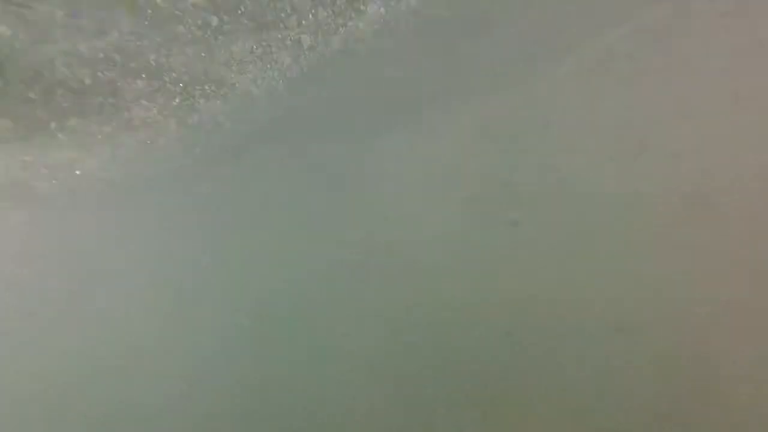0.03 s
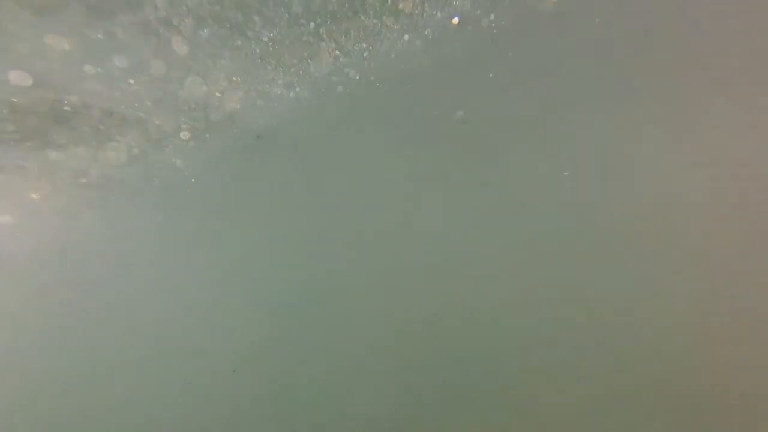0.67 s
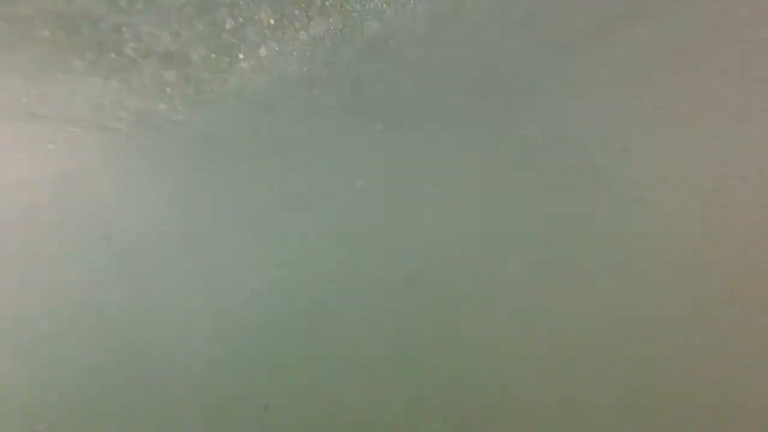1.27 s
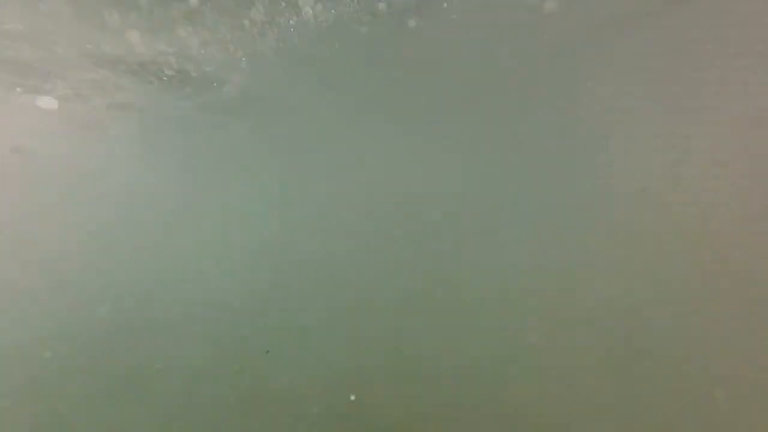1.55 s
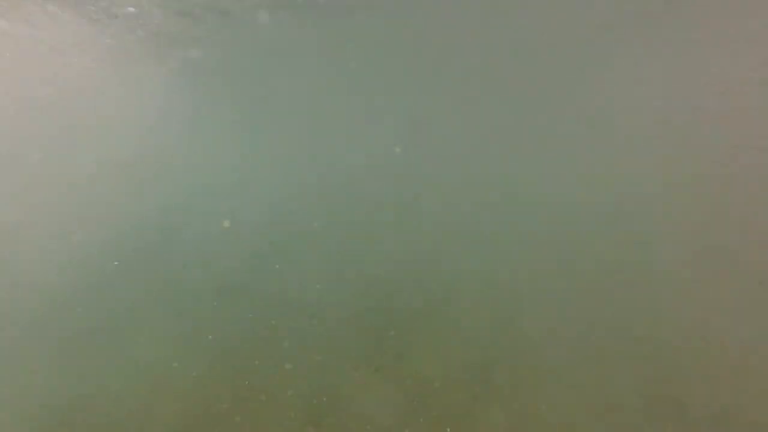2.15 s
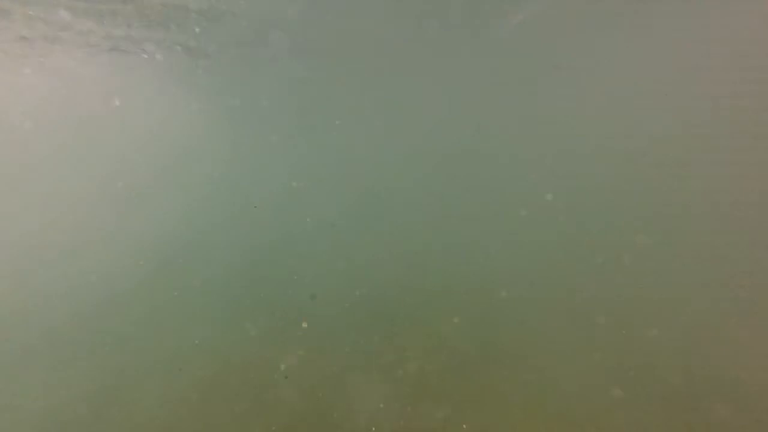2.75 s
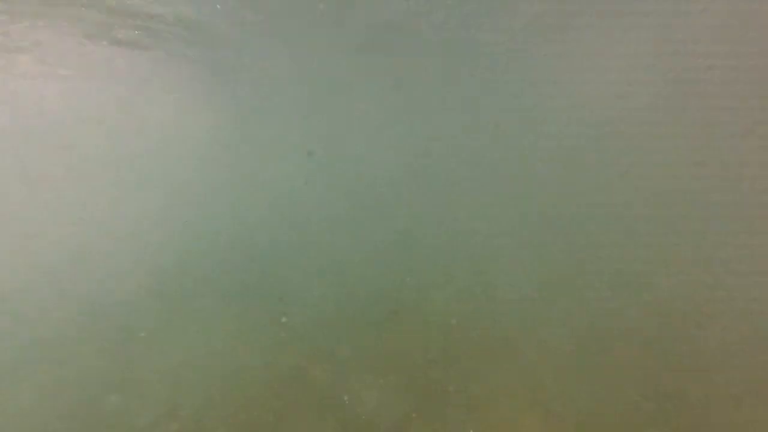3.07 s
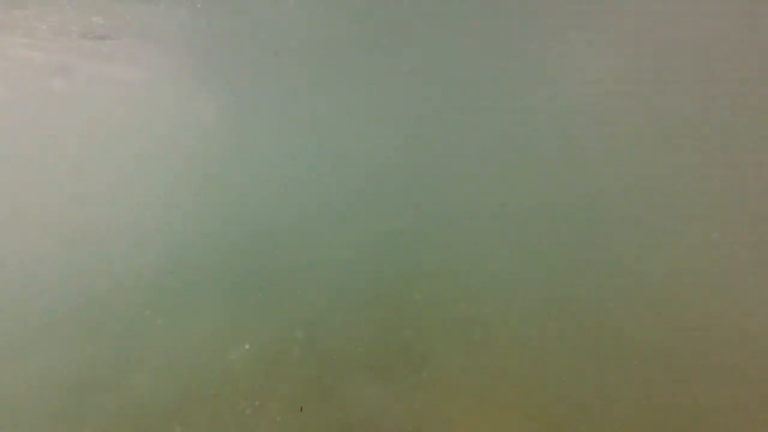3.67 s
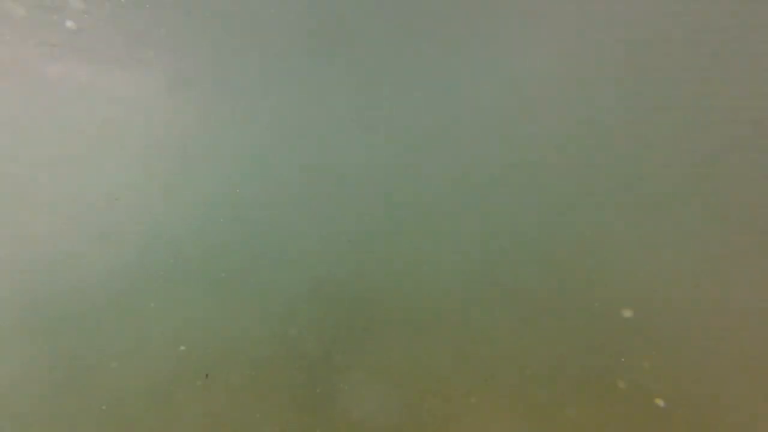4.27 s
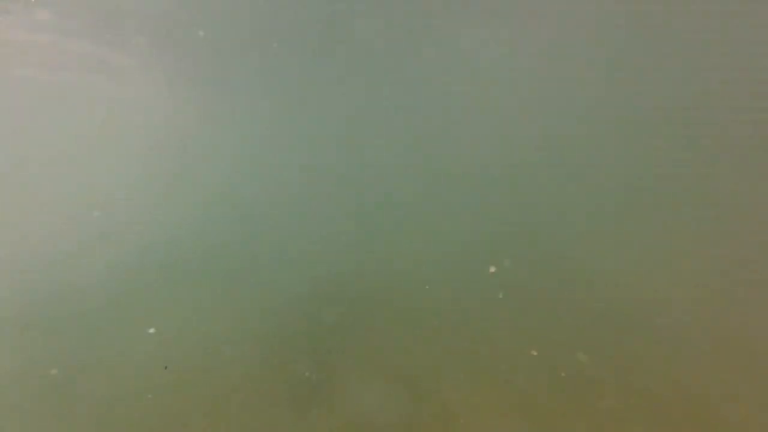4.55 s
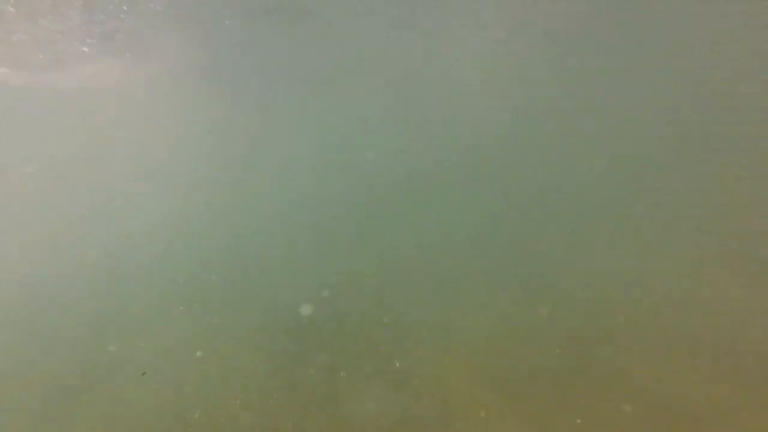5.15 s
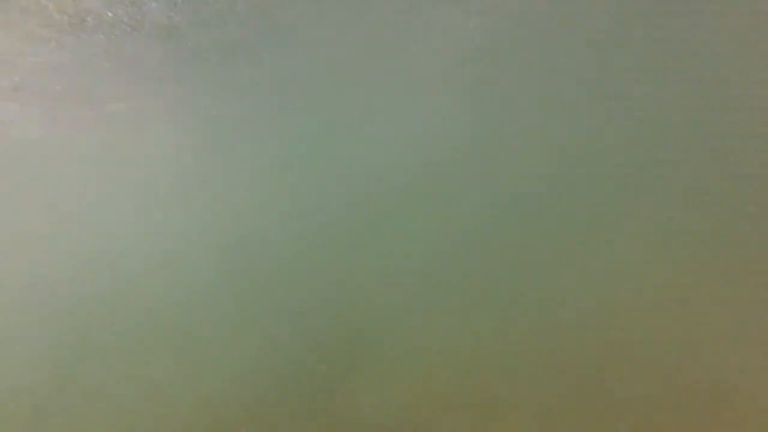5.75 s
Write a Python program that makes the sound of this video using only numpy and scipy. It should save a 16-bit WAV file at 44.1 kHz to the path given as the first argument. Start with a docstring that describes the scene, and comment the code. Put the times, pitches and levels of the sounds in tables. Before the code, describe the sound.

Small waves break overhead, heard from underwater through a submerged camera's own microphone for about six seconds. A muffled rush of surf and a hollow, uneven hum run throughout, above a low rumble that swells and eases with the surge. Air bubbles pop and plip close by, many each second at irregular intervals, with a finer crackle and light fizz farther out. The sharpest pops come at about 1.2, 1.4 and 5.3 seconds. Eddies bump the housing with soft, dull thuds, frequent during the first two seconds, returning just after 3 seconds and clustering again from 5.3 to 5.7 seconds. The distant crackle eases around 3.5 seconds, when the close pops also thin out, then builds slightly toward the end. A very faint, thin electronic whine from the camera appears for a moment at about 2.5 seconds and again at 5.1 seconds.

```python
"""Small waves breaking over a submerged camera, heard through its own microphone. The surge presses on
the housing and eddies bump against it. Pinched-off air bubbles ring for a few cycles each, singly
close by and as a fine crackle farther out, over the steady rush of the surf and a hollow drone of
the housing. Twice the camera's electronics whine faintly."""
import sys
import numpy as np
from scipy import signal
from scipy.fft import rfft, irfft, next_fast_len
from scipy.io import wavfile
from scipy.ndimage import uniform_filter1d, map_coordinates

SR = 44100
rng = np.random.default_rng(int(sys.argv[2]) if len(sys.argv) > 2 else 0)


def file_out(sig):
    """Save sig as 16-bit WAV at sys.argv[1]."""
    # one column per channel
    cols = np.atleast_2d(sig).T
    # limit, then scale
    lim = np.clip(cols, -1, 1)
    pcm = np.round(lim * 32767).astype(np.int16)
    wavfile.write(sys.argv[1], SR, pcm)


N = 260631


def amp(db):
    """Decibels to gain."""
    return 10 ** (np.asarray(db) / 20)


def unit(x):
    """Scale to rms 1."""
    return x / np.sqrt(np.mean(x ** 2) + 1e-20)


def curves(rows):
    """One value per sample for each column after the time."""
    times, *columns = np.transpose(rows)
    return [np.interp(np.arange(N) / SR, times, column) for column in columns]


def wobble(knots_per_s):
    """A smooth random curve."""
    return map_coordinates(rng.standard_normal(4096), [np.arange(N) * knots_per_s / SR], mode="wrap")


def filtered(x, response):
    """Pass x through a response given as a function of Hz."""
    size = next_fast_len(N + SR // 2)
    return irfft(rfft(x, size) * response(np.fft.rfftfreq(size, 1 / SR)), size)[:N]


def gain_at(spectrum, hz):
    """Gain of (Hz, dB) points joined on a log axis."""
    points_hz, db = np.transpose(spectrum)
    return amp(np.interp(np.log(hz + 1), np.log(points_hz), db))


def rush(spectrum):
    """Noise of rms 1 with the given colour."""
    return unit(filtered(rng.standard_normal(N), lambda hz: gain_at(spectrum, hz)))


def resonance(f, hz, width_hz):
    """Response of one damped mode, 1 at its centre."""
    return 1j * f * width_hz / (hz * hz - f * f + 1j * f * width_hz)


def evened(x, seconds):
    """Noise with its slow chance swells smoothed away, rms 1."""
    window = int(seconds * SR) + 1
    power = np.abs(uniform_filter1d(x ** 2, window))
    return unit(x / np.sqrt(uniform_filter1d(power, window) + 0.0045))


# Turbulence right at the microphone. Each row: frequency in Hz, relative level in dB.
TURBULENCE_SPECTRUM = [(20, -30.5), (45, -3.5), (65, -4), (90, -3.5), (150, -14.5), (300, -28),
                       (600, -32.5), (1500, -100)]

def eddies(count, spread_db):
    """Small eddies flutter on the housing: soft knocks of uneven timing and size, rms 1."""
    when, size, side = rng.random((count, 3)).T
    moments = ((np.arange(count) + 2 * when) * N / count).astype(int)
    kicks = np.bincount(moments, amp(spread_db * size) * np.sign(side - .5), N)[:N]
    return unit(filtered(kicks, lambda hz: gain_at(TURBULENCE_SPECTRUM, hz)))


# The surge's rumble on the housing. Each row: frequency in Hz, relative level in dB.
SURGE_SPECTRUM = [(7, -10), (18, -11), (27, -18), (38, -24.5), (60, -45), (120, -62), (300, -120)]
# Water moving past the microphone. Each row: time in seconds, surge and turbulence in relative dB.
FLOW_LEVELS = [(0.05, -42, -55), (0.45, -33.5, -53), (0.63, -39.5, -62), (0.85, -39.5, -53),
               (1.45, -37, -54.5), (1.9, -31, -62), (2.3, -46.5, -58), (2.5, -36, -56.5), (2.75, -40, -60),
               (3.6, -39.5, -56), (3.92, -36.5, -55), (4.27, -43.5, -56.5), (4.5, -36.5, -63.5),
               (5.1, -43.5, -59.5), (5.45, -38.5, -52.5), (5.91, -38, -56)]

def flow():
    """Slow pressure swings of the surge, with a flutter of small eddies on top."""
    surge_db, turbulence_db = curves(FLOW_LEVELS)
    surge = amp(surge_db + 3.5) * evened(rush(SURGE_SPECTRUM), seconds=0.17)
    return surge + amp(turbulence_db - 4.5) * eddies(count=210, spread_db=9)


def ring(peak_s, db, hz, life):
    """Ringing bubbles: each a sliding sine that swells for `life` cycles to its peak, then dies away."""
    glide = 0.028  # typical share by which the pitch slides over one life
    samples = np.arange(SR // 40)
    cycles = hz[:, None] * samples / SR
    age = cycles / life[:, None]
    start_phase, slide = rng.random((len(peak_s), 2)).T[..., None]
    phase = start_phase + cycles * (1 + glide * (2 * slide - .5) * (age - 2))
    envelope = amp(db)[:, None] * (age * np.exp(1 - age)) ** 2
    waves = envelope * np.sin(2 * np.pi * phase)
    onsets = np.abs((peak_s - life / hz)[:, None] * SR).astype(int)
    return np.bincount((onsets + samples).ravel(), waves.ravel(), N)[:N]


def swarm(spectrum, count, spread_db, life):
    """Bubbles at random moments, rms 1; their pitches crowd where the spectrum is strong."""
    when, which, faintness, length = rng.random((count, 4)).T
    grid_hz = np.linspace(750, 6500, 600)
    share = np.cumsum(gain_at(spectrum, grid_hz) ** 2 * np.sqrt(grid_hz))
    hz = np.interp(which, share / share[-1], grid_hz)
    db = -spread_db * np.log(faintness + .07)  # many are faint and a few stand out
    return unit(ring(when * N / SR, db, hz, life * (.5 + length)))


def scatter(x, t60=0.019):
    """Echoes from the rippled surface and the bed, changing as the water moves."""
    t = np.arange(SR // 20) / SR
    knots = np.linspace(0, N, 24)
    echoes = np.zeros(N)
    for centre in knots:
        tail = rng.standard_normal(len(t)) * amp(-60 * t / t60) * (1 - np.exp(-t / 0.0013))
        crossfade = np.clip(1 - np.abs(np.arange(N) - centre) / knots[1], 0, 1)
        echoes += signal.oaconvolve(x * crossfade, tail / np.linalg.norm(tail))[:N]
    return echoes


# The bubble cloud farther out, and its finest fizz. Each row: frequency in Hz, relative level in dB.
FOAM_SPECTRUM = [(200, -34.5), (450, -6), (580, 2), (680, -9.5), (830, -2), (1040, 4.5), (1270, -1.5),
                 (1500, -7.5), (1900, -5), (2400, -16), (2850, -7), (3800, -23.5), (7500, -33.5)]
FIZZ_SPECTRUM = [(300, -10.5), (1000, 4.5), (2000, -0.5), (3200, -1), (4800, -4), (6500, -4), (7600, -12.5)]
# Waves breaking overhead. Each row: time in seconds, then drone, foam and far wash in relative dB.
SURF_LEVELS = [(0, -59, -62, -73), (1.7, -62, -63.5, -73), (2.3, -64, -66, -74),
               (3.45, -66.5, -71.5, -77.5), (3.62, -66.5, -70.5, -72.5), (4.7, -66, -68.5, -71.5),
               (5.35, -61, -69, -78.5), (5.91, -66, -65, -76.5)]

def foam():
    """The bubble cloud: a blurred rush and small plips that swell with the wave, under a steady fizz."""
    _, foam_db, _ = curves(SURF_LEVELS)
    swell = amp(foam_db + 0.95 * wobble(7.2))
    plips = swarm(FOAM_SPECTRUM, count=1000, spread_db=5, life=1.3)
    ticks = swarm(FIZZ_SPECTRUM, count=800, spread_db=5, life=1.5)
    crackle = amp(0.5) * swell * plips + amp(-72) * ticks
    echoes = amp(-3.5) * scatter(crackle)
    blur = amp(-5.5) * swell * rush(FOAM_SPECTRUM)
    fizz = amp(-69) * rush(FIZZ_SPECTRUM)
    return crackle + echoes + blur + fizz


# Distant surf, heard from under water. Each row: frequency in Hz, relative level in dB.
WASH_SPECTRUM = [(250, -21), (450, -4.5), (570, -3.5), (720, -9), (1100, -32)]

def far_wash():
    """A soft rush of surf, well away from the microphone."""
    _, _, wash_db = curves(SURF_LEVELS)
    return amp(wash_db + 2.4 * wobble(5)) * rush(WASH_SPECTRUM)


# The hollow hum around the microphone. Each row: frequency in Hz, relative level in dB.
DRONE_SPECTRUM = [(80, -27), (160, -4.5), (215, -4.5), (282, 3), (325, -2.5), (420, -12.5), (600, -22),
                  (1500, -60.5)]

def drone():
    """The surf keeps the housing's lowest resonance humming, uneven in level and pitch."""
    drone_db, _, _ = curves(SURF_LEVELS)
    steady = rush(DRONE_SPECTRUM)
    speed = 1 + 0.04 * wobble(12)  # the pitch drifts by about 4 %
    hum = map_coordinates(steady, [np.cumsum(speed)], mode="mirror")
    return amp(drone_db + 2 + 1.1 * wobble(12)) * hum


# Modes of the walls around the microphone. Each row: frequency in Hz, width in Hz, gain in dB.
HOUSING_MODES = [(585, 92, 7), (1070, 740, 2), (1630, 450, -4.5), (2680, 88, -8.5)]

def housing(x):
    """The brief ring of the housing's walls."""
    return filtered(x, lambda f: sum(amp(db) * resonance(f, hz, width) for hz, width, db in HOUSING_MODES))


# Bubbles close to the microphone; a short life is a dry pop, a long one a plip.
# Each row: time of the peak in seconds, peak level in dB, pitch in Hz, life in cycles.
NEAR_BUBBLES = [(0.025, -43, 1110, 0.68), (0.041, -50, 1020, 1.9), (0.076, -39.5, 1056, 3.4),
                (0.13, -47, 970, 1.77), (0.153, -41.5, 2000, 1.66), (0.17, -42.5, 1210, 1.4),
                (0.244, -44.5, 1050, 2.1), (0.263, -45.5, 1040, 1.63), (0.295, -47, 2280, 3.6),
                (0.329, -42, 1030, 1.2), (0.355, -52, 925, 1.6), (0.568, -39, 1260, 3.5),
                (0.602, -43.5, 3030, 2.9), (0.658, -47.5, 1000, 1.7), (0.674, -44, 1220, 2.2),
                (0.698, -48, 1870, 2.9), (0.758, -45, 850, 1.07), (0.765, -50, 6200, 4.5),
                (0.793, -49, 880, 0.7), (0.852, -41.5, 1050, 0.95), (0.879, -38, 1090, 1.3),
                (0.968, -46.5, 1040, 1.9), (1.008, -42, 1040, 1.9), (1.025, -43.5, 1200, 2),
                (1.041, -40.5, 1090, 1), (1.047, -49.5, 4100, 4.1), (1.161, -29.5, 836, 0.94),
                (1.181, -40, 2070, 1.9), (1.19, -42, 1020, 1.06), (1.193, -43.5, 1900, 2.6),
                (1.217, -45, 1120, 1.03), (1.267, -42, 1030, 2.1), (1.348, -42.5, 990, 2.05),
                (1.381, -42.5, 1040, 2.9), (1.427, -37.5, 980, 1.16), (1.444, -34.5, 1270, 1),
                (1.51, -37.5, 1100, 1.7), (1.574, -45, 1640, 2.6), (1.601, -40, 900, 2),
                (1.676, -47, 1120, 2), (1.688, -39, 1045, 1.9), (1.724, -45, 2100, 1.2),
                (1.737, -43.5, 4550, 2.9), (1.738, -41, 1880, 0.72), (1.805, -39.5, 1130, 1),
                (1.814, -42, 2510, 1.5), (1.838, -40.5, 1000, 1.2), (1.878, -45.5, 1030, 1.2),
                (1.967, -49.5, 1300, 2.1), (2.004, -46, 1080, 2.4), (2.023, -44, 1046, 3),
                (2.043, -46.5, 1880, 2.8), (2.079, -46, 1290, 1.2), (2.166, -38, 970, 1.5),
                (2.187, -42, 1410, 0.71), (2.195, -45.5, 1090, 1.63), (2.314, -45.5, 2700, 0.89),
                (2.359, -44, 820, 1.27), (2.366, -42.5, 1230, 2.85), (2.389, -47, 880, 2.5),
                (2.466, -43, 1530, 1.4), (2.486, -48, 1000, 1.56), (2.542, -45.5, 1670, 1.44),
                (2.612, -39, 1030, 1.54), (2.645, -41, 1040, 2.4), (2.655, -42, 1000, 0.53),
                (2.675, -46.5, 1110, 1.4), (2.8, -44.5, 860, 0.62), (2.836, -42.5, 1130, 0.69),
                (2.894, -41, 2900, 2.5), (3.094, -36.5, 1100, 1.06), (3.124, -47, 2540, 1.7),
                (3.14, -38, 2860, 2.2), (3.183, -41.5, 1060, 2.4), (3.24, -48.5, 5060, 2.8),
                (3.259, -46.5, 980, 2.25), (3.328, -42, 995, 1.8), (3.348, -51, 3040, 7),
                (3.434, -47.5, 1050, 1.45), (3.455, -47, 4930, 1.8), (3.625, -50, 1290, 1.94),
                (3.903, -43.5, 945, 1.1), (3.992, -43.5, 790, 0.9), (4.02, -38.5, 1830, 2.2),
                (4.042, -44, 1510, 1.15), (4.094, -44, 1023, 2.2), (4.246, -42, 1830, 1.84),
                (4.264, -41.5, 1790, 1.7), (4.298, -41.5, 3340, 4), (4.406, -50, 1040, 1.8),
                (4.422, -43, 980, 0.81), (4.595, -41, 1240, 3.3), (4.756, -52, 1030, 2.2),
                (4.8, -50, 1100, 1.6), (4.861, -52.5, 6040, 4), (4.957, -48, 4060, 2.1),
                (5.023, -50, 1090, 2.2), (5.064, -45, 1820, 1.3), (5.114, -45.5, 3820, 1.7),
                (5.172, -41, 4600, 2.1), (5.236, -49.5, 1030, 4.1), (5.282, -34.5, 1254, 1.14),
                (5.65, -45.5, 1020, 1.15), (5.678, -46.5, 1060, 1.9), (5.715, -41.5, 1040, 1.66)]

def near_bubbles():
    """Single pops and plips; each pinch-off sheds a smaller bubble and sets the housing ringing."""
    peak_s, db, hz, life = np.transpose(NEAR_BUBBLES)
    delay, smallness, strength = rng.random((len(peak_s), 3)).T
    shed_limit_db = -42.5  # louder bubbles shed no bigger fragment
    shed_s = peak_s + 0.0025 * (delay - .25)
    shed_hz = np.minimum(hz + 600 + 2200 * smallness ** 2, 6500)
    shed_db = np.minimum(db, shed_limit_db) - 8 + 6 * strength - 4 * smallness
    plips = ring(peak_s, db, hz, life) + ring(shed_s, shed_db, shed_hz, life=1 + smallness)
    return plips + scatter(amp(-13.5) * plips + amp(-3) * housing(plips))


# Eddies that hit the housing, right at the microphone.
# Each row: time in seconds, relative level in dB, width in seconds.
EDDY_BUMPS = [(0.086, -32, 0.0042), (0.138, -23, 0.0041), (0.343, -42, 0.0029), (0.399, -31.5, 0.0066),
              (0.515, -27.5, 0.011), (0.77, -32, 0.0029), (0.861, -32.5, 0.0028), (0.91, -25, 0.0081),
              (1.034, -31.5, 0.0035), (1.088, -26, 0.00087), (1.198, -19.5, 0.012), (1.285, -31.5, 0.0016),
              (1.376, -27, 0.0005), (1.466, -28, 0.0051), (1.547, -25, 0.012), (1.802, -30, 0.00092),
              (2.086, -23.5, 0.017), (3.13, -25.5, 0.008), (3.246, -30.5, 0.0041), (3.336, -23, 0.015),
              (3.722, -32, 0.0041), (3.952, -34, 0.0034), (4.151, -29, 0.0088), (4.517, -25.5, 0.005),
              (5.277, -24, 0.0059), (5.392, -28, 0.004), (5.435, -22.5, 0.0032), (5.495, -32.5, 0.0036),
              (5.641, -29, 0.0035), (5.734, -25, 0.0036)]

def bumps():
    """Each eddy passes as one cusp of pressure: a soft thud, more of a knock the narrower it is."""
    t = np.arange(N) / SR
    pressure = np.zeros(N)
    for centre_s, db, width_s in EDDY_BUMPS:
        away_s = np.hypot(t - centre_s, 0.00075)  # rounds the tip of the cusp
        cusp = np.exp(-np.minimum(away_s / width_s, 20))
        pressure += amp(db) * rng.choice([-1, 1]) * cusp
    # the housing's lowest resonance lends the thud a hollow note
    return filtered(pressure, lambda f: 1 + amp(3) * resonance(f, hz=282, width_hz=81))


# Whine from inside the camera. Each row: start in seconds, end in seconds, level in dB.
WHINE_SPELLS = [(2.525, 2.697, -72.5), (5.127, 5.3, -70.5)]
# Its partials. Each row: frequency in Hz, relative level in dB.
WHINE_PARTIALS = [(1593, -5.5), (3186, -7), (6372, -9.5)]

def whine():
    """The camera's electronics give a thin, slightly unsteady whine that comes and goes."""
    t = np.arange(N) / SR
    gate = sum(amp(db) * np.clip(np.minimum(t - start, end - t) / 0.011, 0, 1)
               for start, end, db in WHINE_SPELLS)
    clock = np.cumsum(1 + 0.015 * wobble(60)) / SR
    tone = sum(amp(db) * np.sin(2 * np.pi * hz * clock) for hz, db in WHINE_PARTIALS)
    return gate * np.sqrt(2) * tone


def scene():
    """Everything meets at one microphone under the breaking waves."""
    return (near_bubbles() + foam() + far_wash() + flow() + bumps() + drone() + whine())[None]


def record(dry):
    """The camera keeps nothing above its band limit."""
    top_hz = 7700
    return filtered(dry[0], lambda hz: 1 / np.sqrt(1 + (hz / top_hz) ** 120))[None]


dry = scene()
out = record(dry)
file_out(out)
```